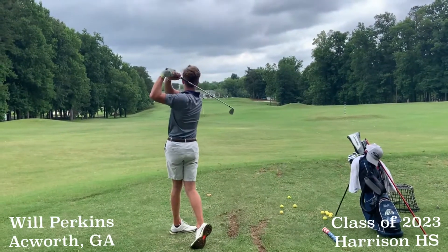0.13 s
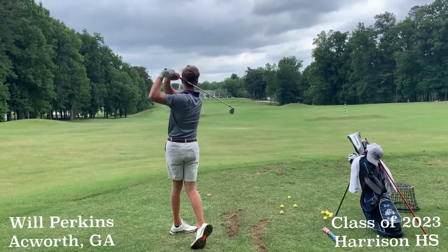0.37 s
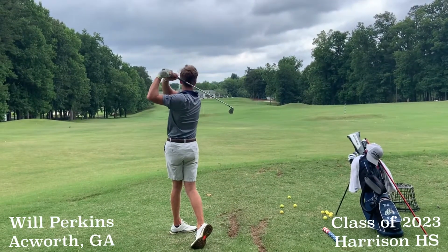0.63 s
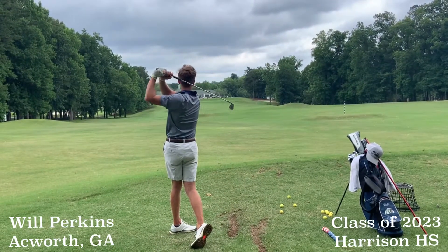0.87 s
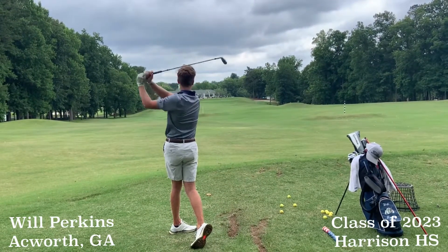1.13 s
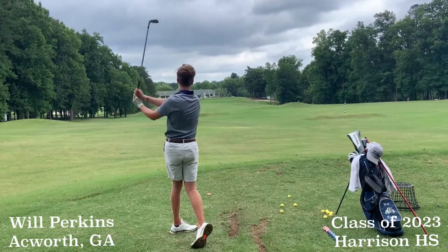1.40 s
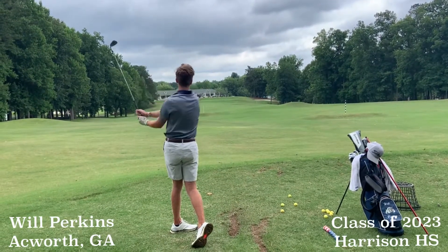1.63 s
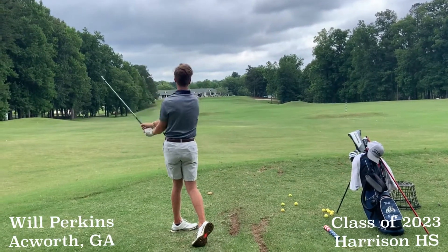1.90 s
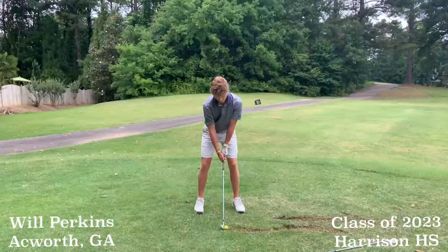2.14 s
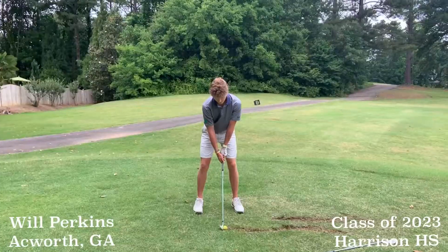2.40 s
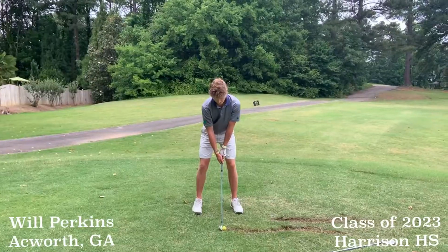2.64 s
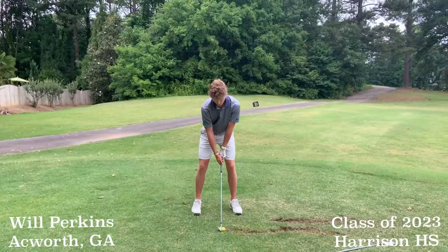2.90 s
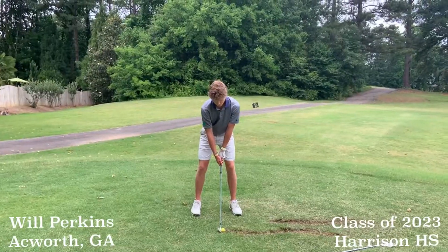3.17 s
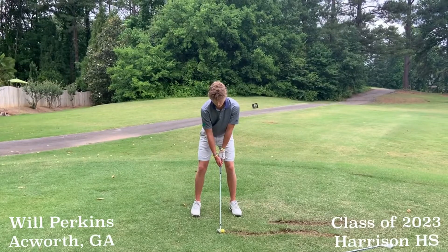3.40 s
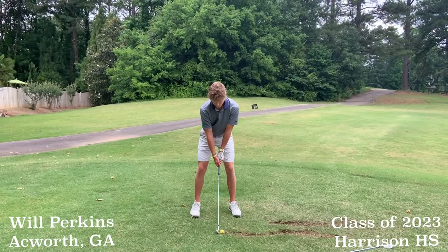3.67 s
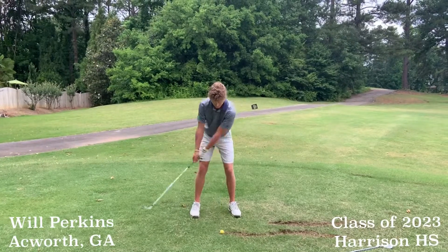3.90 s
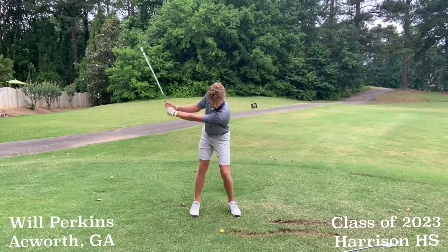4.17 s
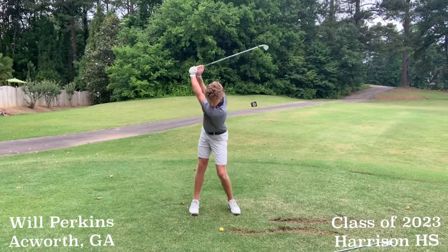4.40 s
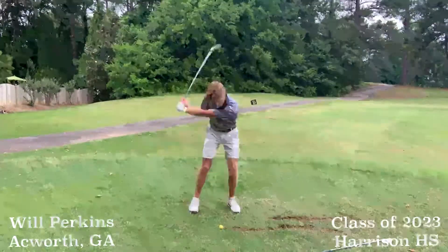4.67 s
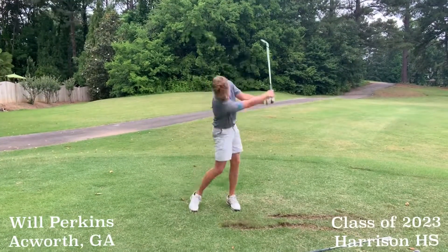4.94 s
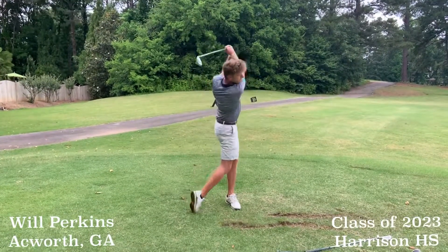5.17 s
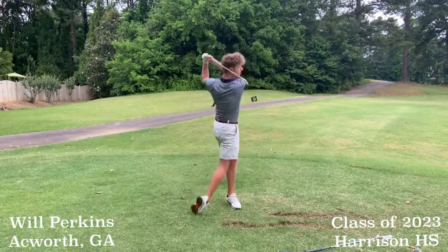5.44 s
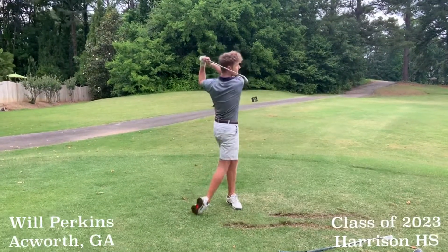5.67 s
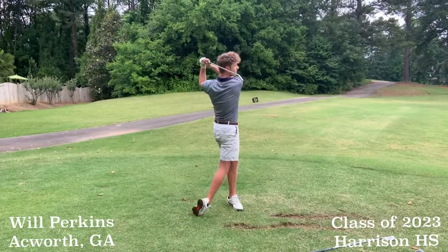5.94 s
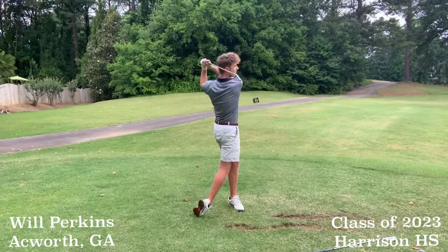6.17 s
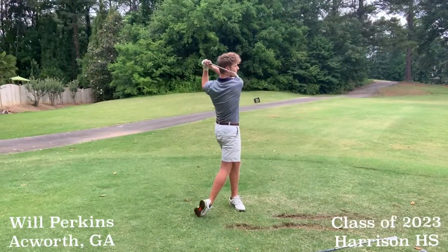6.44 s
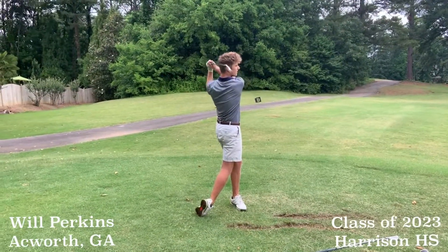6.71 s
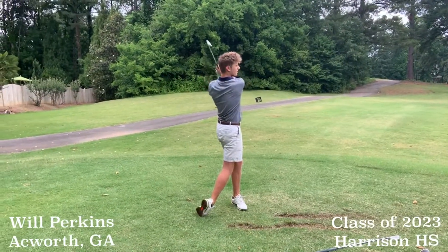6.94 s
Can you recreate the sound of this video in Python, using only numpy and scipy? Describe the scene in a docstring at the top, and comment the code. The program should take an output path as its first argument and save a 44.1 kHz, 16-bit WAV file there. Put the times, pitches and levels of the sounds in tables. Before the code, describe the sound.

Handheld stereo phone outdoors, wind rumbling on the microphone throughout. First a quiet fairway with faint engine hum, tiny birds and two moments of dry club clinking. After an abrupt edit, rapid bird trills, clear falling whistles and a throbbing far engine that fades. Short high chips precede a fast club whoosh and a loud, dry iron strike, its wash scattering through trees; the engine returns at the end.

```python
"""Golf: fairway, then a tee shot

Fairway: shaped noise for leaves and far traffic, engine hum, chirps, a thin whistle, clubs clinking as damped modes.
After a short silence, the tee: gliding near-sines for a trilling and a whistling bird, a far mower and a throbbing
engine. An iron sheds vortices, cracks the ball (ringing modes) and tears the turf; decaying noise is the echo.
Wind noise and falling thumps buffet the stereo microphone of a phone throughout."""
import sys
import numpy as np
from scipy import signal
from scipy.fft import rfft, irfft, next_fast_len
from scipy.io import wavfile
from scipy.ndimage import uniform_filter1d

SR = 44100
rng = np.random.default_rng(int(sys.argv[2]) if len(sys.argv) > 2 else 0)


def elevation(decibels):
    """Turn decibel levels (scalar or array-like) into linear amplitude ratios."""
    levels = np.asarray(decibels, float)
    return 10 ** (levels / 20)


def wav_out(sig):
    """Save sig, one row per channel (or a flat mono array), as 16-bit PCM at SR to the path in sys.argv[1]."""
    wavfile.write(sys.argv[1], SR, np.round(np.clip(np.atleast_2d(sig).T, -1, 1) * 32767).astype(np.int16))


N = 311787
TIME_S = np.arange(N) / SR
CUT_S, RESUME_S = 2.1885, 2.199  # fairway ends, tee begins
LEFT_RIGHT_SIGN = np.array([[1], [-1]])  # spreads a side signal
TREBLE_LAG_SAMPLES = 8  # left port hears the treble of the strike late

# contacts of the strike, ball first, then sole and turf:
# (time [s], level [dB], contact time [ms], grit [dB], tearing [dB])
CONTACTS = [(4.8457, -15.5, .16, -8, -15), (4.8462, -15.5, .13, -15, -16), (4.8477, -8, .09, -17, -16),
            (4.8496, -19.5, .08, -12, -20), (4.8499, -15.5, .52, -20, -20), (4.8516, -13, .53, -28, -24),
            (4.8549, -19, 1.3, -36, -24)]


def read_log(table, hz):
    """Interpolates a (frequency [Hz], value) table on a log-frequency axis."""
    f, value = np.transpose(table)
    return np.interp(np.log(np.maximum(hz, 1)), np.log(np.maximum(f, 1)), value)


def unit(x):
    """Scales to rms 1."""
    return x / np.sqrt(np.mean(x ** 2))


def waver(rate_hz):
    """Random levels held 1 / rate_hz s, then smoothed twice; rms 1."""
    hold = int(SR / rate_hz)
    steps = np.repeat(rng.standard_normal(N // hold + 1), hold)
    return unit(uniform_filter1d(uniform_filter1d(steps, hold), hold)[:N])


def noise(gain):
    """Noise whose spectrum follows gain(Hz)."""
    size = next_fast_len(N)
    hz = np.arange(size // 2 + 1) * SR / size
    return irfft(rfft(rng.standard_normal(size)) * gain(hz), size)[:N]


def coloured(colour):
    """Noise of rms 1 with a (frequency [Hz], density [dB]) colour."""
    return unit(noise(lambda hz: elevation(read_log(colour, hz))))


def octaves(colour, lowest_hz):
    """Coloured noise, rms about 1 in sum, as five octave bands; the outer two take all beyond."""
    def band_gain(hz, k):
        octave = np.log2(np.clip(hz / lowest_hz, 1, 16))
        return elevation(read_log(colour, hz)) * np.cos(np.pi / 2 * np.clip(octave - k, -1, 1))
    return unit(np.array([noise(lambda hz: band_gain(hz, k)) for k in range(5)])) / np.sqrt(5)


def band(x, lo_hz, hi_hz):
    """Band-pass."""
    return signal.sosfilt(signal.butter(2, [lo_hz, hi_hz], "band", fs=SR, output="sos"), x)


def gain_over_time(table, column=1):
    """Gain from a dB column against time, silent outside the table."""
    rows = np.array(table)
    return elevation(np.interp(TIME_S, rows[:, 0], rows[:, column], -200, -200))


def ring(x, hz, t60_s):
    """One damped mode driven by x."""
    pole = np.exp(2j * np.pi * hz / SR - np.log(1000) / (t60_s * SR))
    return signal.lfilter([1], [1, -pole], x).imag


def add(out, start_s, x):
    """Mixes x into out from start_s."""
    i = int(start_s * SR)
    out[..., i:i + x.shape[-1]] += x


def spaced(x, left_lag_samples, left_minus_right_db):
    """A point source on two ports: delay and level difference."""
    left = np.roll(x, left_lag_samples) * elevation(left_minus_right_db / 2)
    return np.array([left, x * elevation(-left_minus_right_db / 2)])


def trees(x, t60_s, db, onset_s=.012):
    """Scattering among trunks and leaves: a decaying noise tail, unrelated left and right."""
    t = np.arange(int(.6 * SR)) / SR
    tail = rng.standard_normal((2, len(t))) * elevation(-60 * t / t60_s) * (1 - np.exp(-t / onset_s))
    tail = tail / np.sqrt(np.sum(tail ** 2) / 2)
    return elevation(db) * signal.fftconvolve(x[None], tail, axes=1)[:, :N]


def note(table):
    """A bird's near-sine along (time [s], pitch [Hz], rms level [dB]) rows; returns start and sound."""
    s, hz, db = np.transpose(table)
    t = np.arange(s[0], s[-1], 1 / SR)
    fade = np.clip(np.minimum(t - s[0], s[-1] - t) / .003, 0, 1)
    phase = 2 * np.pi * np.cumsum(np.interp(t, s, hz)) / SR
    return s[0], np.sqrt(2) * fade * elevation(np.interp(t, s, db)) * np.sin(phase)


def air(mid_colour, side_colour, side_db, swell_db, flicker_db):
    """Leaves and far traffic: octave bands swell together, flicker alone; the road reaches left first."""
    # (time [s], level [dB])
    air_level = [(0, -61.5), (.5, -64), (2.19, -64.5), (2.36, -61), (3.1, -62), (4.7, -61), (5.4, -60.5),
                 (6.5, -62), (7.07, -59.5)]

    def octave(colour, centre_hz):
        def gain(hz):
            distance = np.clip(np.log2(hz / centre_hz + 1e-9), -1, 1)
            return elevation(read_log(colour, hz)) * np.cos(np.pi / 2 * distance)
        return noise(gain)

    mid, side, swell = 0, 0, waver(1.5)
    for centre_hz in 180 * 2. ** np.arange(7):
        gain = elevation(swell_db * swell + flicker_db * waver(6.7))
        mid = mid + gain * octave(mid_colour, centre_hz)
        side = side + gain * octave(side_colour, centre_hz)
    mid, side = (x / np.std(band(x, 600, 2100)) for x in (mid, side))
    leaves = mid + elevation(side_db) * LEFT_RIGHT_SIGN * side
    road = spaced(unit(band(band(rng.standard_normal(N), 500, 2000), 370, 2500)), -14, 0)
    return gain_over_time(air_level) * (elevation(-3.0) * leaves + elevation(-5.0) * road)


def hum(lines, waver_hz, waver_db):
    """Engine tones that waver in pitch and level over the distance."""
    out = 0
    for hz, db in lines:
        phase = 2 * np.pi * np.cumsum(hz + waver_hz * waver(5)) / SR
        out = out + np.sqrt(2) * elevation(db + waver_db * waver(13)) * np.sin(phase)
    return out


def drone():
    """A far engine fades away and later returns: throbbing, wavering firing tones in a band of rumble."""
    # (frequency [Hz], relative level [dB])
    firing_tones = [(207, -67), (274.5, -53.5), (344.5, -59), (411, -59.5), (482, -63.5), (578, -67.5)]
    # (time [s], level [dB])
    drone_level = [(2.2, -55), (2.35, -54), (2.45, -52.5), (2.6, -54), (2.75, -63.5), (3.0, -79),
                   (6.4, -81.5), (6.7, -69.5), (7.07, -57.5)]
    throb_hz, throb_db = 17, 2.5
    rumble = unit(noise(lambda hz: 1 / (1 + ((hz - 380) / 130) ** 4)))
    tones = unit(hum(firing_tones, 2.5, 1.5))
    throb = elevation(0.6 * waver(13) + throb_db * np.sin(2 * np.pi * throb_hz * TIME_S))
    return gain_over_time(drone_level) * throb * (0.55 * rumble + 0.9 * tones)


def wind():
    """Eddies rumble on the ports in quick bunches; single strong ones thump, falling in pitch as they pass."""
    # (time [s], level [dB])
    gust_level = [(0, -45), (.12, -46.5), (.22, -58), (.35, -39.5), (.52, -52.5), (1.2, -52), (1.7, -51),
                  (1.89, -42.5), (2.08, -54), (2.37, -42), (2.5, -47), (3.0, -45.5), (3.08, -38.5),
                  (3.29, -38), (3.45, -52), (3.75, -43), (4.16, -50.5), (4.21, -41), (4.6, -49),
                  (4.9, -43.5), (4.96, -37.5), (5.7, -49.5), (5.85, -47), (6.4, -49), (6.82, -48.5),
                  (6.89, -36.5), (7.0, -44.5), (7.07, -40)]
    # colours on fairway and tee: (frequency [Hz], density [dB])
    buffet_colours = [(12, -62), (20, -38), (42, -7), (70, 1.5), (97, -7), (118, -8.5), (172, -7.5),
                      (300, -36.5), (390, -68), (660, -120)], [(12, -38), (20, -23.5), (46, -1), (71, 2),
                      (124, -1), (204, -17), (236, -17.5), (300, -23), (390, -52), (660, -120)]
    # side against mid on fairway and tee [dB]
    side_db = -10, -54
    # single eddies: (time [s], level before swell and decay [dB], pitch approached [Hz])
    thumps = [(1.866, -42, 163), (2.343, -26.5, 124.5), (3.063, -25.5, 80), (3.122, -29, 127),
              (3.146, -28.5, 128), (3.258, -33, 142), (3.274, -29, 89), (4.196, -26, 118),
              (4.94, -18.5, 124), (5.248, -30, 198), (5.412, -31, 128.7), (5.96, -37, 148),
              (6.862, -36, 179)]
    on_fairway = TIME_S < CUT_S
    gust = gain_over_time(gust_level) * elevation(2.1 * waver(40) + 1.2 * waver(11))
    mid, side = (np.where(on_fairway, *(coloured(c) for c in buffet_colours)) for _ in range(2))
    out = gust * (mid + LEFT_RIGHT_SIGN * elevation(np.where(on_fairway, *side_db)) * side)
    t = np.arange(SR // 10) / SR
    envelope = np.minimum(t / 0.0029, 1) * np.exp(-t / 0.0058)
    for s, db, hz in thumps:
        phase = 2 * np.pi * np.cumsum(hz * (1.0 + np.exp(-t / 0.0038))) / SR
        add(out, s, elevation(db) * envelope * np.sin(phase))
    return out


def chatter():
    """Small birds far off in the trees beside the fairway: faint, uneven chirps around a few pitches."""
    # pitches [Hz]
    chirp_hz = [2220, 2300, 3900, 4700]
    loudest_db = -69
    out = np.zeros(N)
    for when, kind, tune, size in rng.random((36, 4)):
        s = when * (CUT_S - .1)
        hz = chirp_hz[int(kind * len(chirp_hz))] * (.96 + .08 * tune)
        db = loudest_db - 8 * size
        add(out, *note([(s, hz, db - 6), (s + .012, 1.02 * hz, db), (s + .03, .97 * hz, db - 8)]))
    return spaced(out, 3, -.1) + trees(out, 0.89, -1.6)


def small_birds():
    """A thin high whistle on the fairway, short chips on the tee: brief gliding tones."""
    # thin whistle: (peak time [s], level [dB], pitch [Hz], swell [s], fade [s])
    seeps = [(1.735, -76, 8700, 0.022, .07), (1.865, -72.5, 8560, .015, 0.086)]
    # (time [s], level [dB], pitch [Hz], pitch drop [share])
    chips = [(4.052, -65, 4760, 0.024), (4.3107, -60, 4640, 0.016), (4.36, -65, 4800, 0.033),
             (4.4555, -64, 4635, 0.014), (4.7098, -62, 4690, 0.02), (6.567, -66, 7500, -0.074)]
    out = np.zeros(N)
    for s, db, hz, swell, fade in seeps:
        add(out, *note([(s - swell, hz, db - 20), (s, hz, db), (s + fade, 1.01 * hz, db - 12)]))
    for s, db, hz, drop in chips:
        start, end = (s - .003, (1 + drop) * hz, db - 3), (s + 0.018, (1 - drop) * hz, db - 14)
        add(out, *note([start, (s + .003, hz, db), end]))
    return spaced(out, 2, -.1) + trees(out, 0.25, -6.5)


def whistling_bird():
    """Repeats one slurred near-sine, stretched in length and pitch."""
    # (time [s], pitch [Hz], level [dB])
    slur = [(0, 2980, -18), (.012, 3070, -9), (.045, 3105, -6), (.07, 3090, -5.5), (.088, 3060, 0),
            (.112, 2975, -4), (.135, 2850, -10), (.155, 2690, -6), (.178, 2490, -8), (.19, 2370, -20)]
    # (time [s], level [dB], stretch of length, stretch of pitch)
    whistles = [(2, -49, 0.93, 0.99), (2.385, -50, 1.02, 0.99), (4.022, -53, 0.99, 0.97),
                (4.395, -51.5, 1, 0.99), (6.026, -52, 0.99, .997), (6.399, -52, 1.01, 1.003)]
    out = np.zeros(N)
    for s, db, stretch, tune in whistles:
        x = note(slur * np.array([stretch, tune, 1]))[1]
        add(out, s, elevation(db + .8 * waver(70)[:len(x)]) * x)
    return spaced(out, -13, -1.8) + trees(out, 0.3, -9, onset_s=.04) + trees(out, 0.9, -7)


def trilling_bird():
    """Each syllable is a quick upward sweep, then a downward one, slightly uneven in pitch and level."""
    # syllables: (peak time of the rising note [s], level [dB])
    syllables = [(2.17, -45), (2.301, -49), (2.44, -48), (2.572, -46), (2.708, -49), (2.843, -48),
                 (2.982, -48), (3.123, -48), (3.266, -46.5), (3.405, -49), (3.551, -52), (3.691, -51)]
    # note shapes: (time [s], pitch [Hz], relative level [dB])
    rise = [(-.04, 3300, -25), (-.024, 3950, -13), (-.013, 4500, -10), (-.005, 5000, -4), (0, 5400, -1.5),
            (.003, 5850, -6), (.006, 6300, -28)]
    fall = [(-.005, 7200, -26), (-.003, 6950, -16), (0, 6400, -20), (.002, 5950, 0), (.007, 5350, 3),
            (.01, 5150, -6), (.018, 5200, -22)]
    fall_lag_s, fall_db = 0.03, -3.5  # falling note against rising one
    out = np.zeros(N)
    for (s, rise_db), luck in zip(syllables, rng.standard_normal((len(syllables), 3))):
        falling_db = rise_db + fall_db + 1.2 * luck[2]
        pair = (s, rise_db, rise, luck[0]), (s + fall_lag_s, falling_db, fall, luck[1])
        for at, db, shape, detune in pair:
            start, x = note(shape * np.array([1, 1 + .012 * detune, 1]))
            add(out, at + start, elevation(db) * x * elevation(1.8 * waver(250)[:len(x)]))
    return spaced(out, -6, -1.5) + trees(out, .09, -12, onset_s=.003) + trees(out, .35, -11)


def clinks():
    """Steel heads touch in the bag: a dry tick, a short rattle, and where the head hangs free a faint ring."""
    # (time [s], level [dB], brightness [dB per octave], free ring [dB])
    touches = [(.9241, -44, 4, -34), (1.9955, -56, -3, -24), (2.0081, -38, 0, -24), (2.0212, -62, 1.1, 8),
               (2.0704, -60, -11, -30), (2.0856, -56, -16, -40), (2.0935, -62, -9, -8)]
    # modes: (frequency [Hz], level [dB], t60 [s], share of the free ring [0..1])
    head_modes = [(1100, -31, .0054, .1), (1590, -17, .007, .1), (2370, -8.5, .008, .28),
                  (3230, -8, .0054, .23), (3910, -17, .06, .44), (4880, -8, .2, .9), (4920, -6, .016, .2),
                  (5500, 7, .007, .1), (6000, -12, .09, 1), (6900, -14, .16, 1), (7400, -30, .005, .34)]
    out, t = np.zeros(N), np.arange(SR // 4) / SR
    for (s, db, tilt_db, ring_db), luck in zip(touches, rng.standard_normal((len(touches), len(head_modes)))):
        touch = (t == 0) + elevation(-31) * np.exp(-t / 0.025) * rng.standard_normal(len(t))
        for (hz, mode_db, t60_s, free), u in zip(head_modes, luck):
            gain = elevation(db + mode_db + free * ring_db + tilt_db * np.log2(hz / 6700.0) + 1.4 * u)
            add(out, s, gain * ring(touch, hz, t60_s))
    out = band(out, 900, 8000)
    return spaced(out, -2, -.1) + trees(out, .25, -13)


def aftermath():
    """The crack comes back from many trunks as a rough wash with an airy top; bits of turf patter down."""
    # reflectors: (distance [m], level [dB], time to rise the last 12 dB [s], t60 [s])
    reflectors = [(2.48, -52, 0.00214, 0.077), (18.5, -50.5, 0.089, 0.35), (35, -58, .03, 0.54)]
    # (frequency [Hz], density [dB])
    echo_colour = [(240, -30), (400, -5), (859, -12.5), (1320, -11.5), (2230, -8), (3770, -16.5),
                   (6460, -17.5), (7600, -27), (8300, -56), (10400, -69), (17600, -120)]
    # hanging treble from near, middle and far scatter: (level [dB], t60 [s])
    airy_top = [(-56, 0.073), (-59, .45), (-80, 3.1)]
    # bits of turf landing, later two scuffs in the grass: (time [s], level [dB], frequency [Hz])
    turf_bits = [(4.925, -38, 3100), (4.957, -45, 1900), (4.968, -49, 2300), (4.992, -36, 2210),
                 (5.052, -35, 1880), (5.081, -43, 1990), (6.946, -39.5, 1920), (7.024, -47, 1580)]
    swells = elevation(np.array([1.6 * waver(55) + 3 * waver(300) for _ in range(5)]))  # one per octave
    wash = np.array([np.sum(swells * octaves(echo_colour, 600), axis=0) for _ in range(2)])
    treble = unit(band(band(rng.standard_normal(N), 9600, 14000), 9600, 15500))
    top = spaced(treble, TREBLE_LAG_SAMPLES, 0)
    since = TIME_S - CONTACTS[-1][0]
    back = 0
    for distance_m, db, swell_s, t60_s in reflectors:
        late = since - 2 * distance_m / 343
        envelope_db = np.maximum(np.minimum(12 * late / swell_s, -60 * late / t60_s), -200)
        back = back + elevation(db + envelope_db) * (since > 0)
    hang = sum(elevation(db - 60 * np.clip(since, 0, 3) / t60_s) * (since > 0) for db, t60_s in airy_top)
    out = np.sqrt(2) * (back * wash + elevation(1.8 * waver(200)) * hang * top)
    t = np.arange(SR // 50) / SR
    for s, db, hz in turf_bits:
        patter = np.exp(-t / 0.008) * rng.standard_normal((2, len(t)))
        add(out, s, elevation(db) * band(patter, 0.89 * hz, 1.3 * hz))
    return out


def swing():
    """The shaft sheds vortices at a rate that follows its speed; the head drags a broad rush."""
    # downswing and follow-through: (time [s], shaft speed [m/s], vortex tone [dB])
    path = [(4.73, 5, -72), (4.76, 11, -60), (4.782, 15.5, -43), (4.793, 18, -37), (4.81, 25, -40),
            (4.828, 30, -45), (4.845, 33, -38), (4.862, 17, -50), (4.877, 19, -49), (4.9, 11, -66),
            (4.93, 5, -80)]
    # (frequency [Hz], density [dB])
    rush_colour = [(300, -29), (600, -5), (1580, -10.5), (2300, -9), (3320, -23.5), (6230, -20),
                   (8530, -40), (10700, -30), (16000, -48.5)]
    strouhal, shaft_m = .2, .01
    rush_db, db_per_decade, steeper_per_octave = -39, 34, 11  # at 30 m/s; growth with speed
    s, speed = np.transpose(path)[:2]
    speed = np.interp(TIME_S, s, speed, .1, .1)
    pitch_hz = strouhal * speed / shaft_m * (1 + .12 * waver(220))
    tone = np.sqrt(2) * elevation(4.5 * waver(200)) * np.sin(2 * np.pi * np.cumsum(pitch_hz) / SR)
    mid, side = (octaves(rush_colour, 600) for _ in range(2))
    rush = 0
    for k in range(len(mid)):
        growth_db = (db_per_decade + k * steeper_per_octave) * np.log10(speed / 30)
        gain = elevation(rush_db + growth_db + 2.0 * waver(150))
        rush = rush + gain * (mid[k] + 0.476 * LEFT_RIGHT_SIGN * side[k])
    return gain_over_time(path, column=2) * tone + rush


def strike():
    """Contacts push modes of head, ball and ground, softer ones longer and lower; grit sprays, turf tears."""
    # (frequency [Hz], level [dB], t60 [s], left minus right [dB], left lag [samples])
    modes = [(245, -14, .09, -.7, 0), (390, -15, .035, 0, 0), (570, -12, .008, -2.5, 0),
             (825, -2.5, .017, -4, 0), (1040, -1, .017, -2, 0), (1350, 3.5, .005, -2, 1),
             (1615, -12, .025, -3.5, 1), (1960, 1, .0075, -1, 0), (2720, -5.5, .008, -2.5, 2),
             (2990, -10, .022, 0, 1), (3580, -7, .019, -9, 4), (5270, -6, .015, -8, 4),
             (7700, -2, .007, 1, 7), (10300, -12, .007, 0, 8), (12600, -11, .006, 0, 8)]
    push, grit, tear = np.zeros((3, SR // 4))
    t = np.arange(SR // 50) / SR
    first_s = CONTACTS[0][0]
    for s, db, contact_ms, grit_db, tear_db in CONTACTS:
        half_sine = np.sin(np.pi * np.minimum(t / contact_ms * 1000, 1))
        add(push, s - first_s, elevation(db) * half_sine / max(contact_ms * SR / 2000, 1))
        add(grit, s - first_s, elevation(grit_db) * np.exp(-t / .0009))
        add(tear, s - first_s, elevation(tear_db) * np.exp(-t / .0015))
    body = 0
    for k, (hz, db, t60_s, pan_db, lag) in enumerate(modes):
        # neighbouring modes swing in opposite senses
        body = body + (-1) ** k * spaced(elevation(db) * ring(push, hz, t60_s), int(lag), pan_db)
    spray = spaced(band(grit * rng.standard_normal(len(grit)), 6000, 14600), TREBLE_LAG_SAMPLES, -1)
    turf = spaced(band(tear * rng.standard_normal(len(tear)), 760, 3500), 1, -2.25)
    out = np.zeros((2, N))
    add(out, first_s, band(body, 120, 18000) + spray + turf)
    return out


def scene():
    """The fairway until the cut, the tee after a moment of silence."""
    # air: mid and side colours (frequency [Hz], density [dB]), then side minus mid [dB]
    fairway_air = [(130, -4), (220, -1), (612, -10), (830, -10.5), (1190, -17.5), (2220, -20),
                   (2760, -20.5), (6300, -26), (8850, -46.5), (11000, -41), (12200, -45.5), (12900, -49),
                   (16000, -63)], [(88, -34), (150, -4), (254, -12), (555, -10), (871, -15.5), (1760, -24),
                   (2310, -18), (5460, -25.5), (9260, -41), (10400, -49), (12700, -44), (13700, -40),
                   (16000, -63)], -2.2
    tee_air = ([(130, -26.5), (220, -3.5), (623, -15.5), (706, -11), (941, -17), (1400, -16.5), (2000, -24),
               (2960, -21.5), (6640, -35), (7530, -42.5), (8090, -55.5), (11000, -43.5), (16000, -71.5)],
               [(130, -49.5), (220, -10), (569, -5), (1420, -7.5), (3070, -13), (3680, -17.5),
               (4990, -17.5), (6760, -32.5), (8850, -31.5), (9680, -35), (10400, -55.5), (13600, -33),
               (16000, -56.5)], -0.39)
    # far engines: (frequency [Hz], rms level [dB])
    fairway_hum = [(166.9, -60.5)]
    mower_hum = [(234, -65.5), (275, -71), (344, -73), (409.1, -82.5), (583, -77.5), (700, -77.5),
                 (927, -80.5), (818.3, -76.5), (1400, -73.5), (1518, -81.5)]
    throughout = wind() + small_birds()
    fairway = air(*fairway_air, 0.16, 0.97) + hum(fairway_hum, 3.66, 2.1) + chatter() + clinks()
    tee = air(*tee_air, 1.0, 1.0) + hum(mower_hum, 3.008, 2.8) + drone()
    tee = tee + (whistling_bird() + trilling_bird()) * (TIME_S > CUT_S)
    tee = tee + aftermath() + swing() + strike()
    fade_in = np.clip((TIME_S - RESUME_S) / 0.0012, 0, 1)
    return (fairway + throughout) * (TIME_S < CUT_S) + (tee + throughout) * fade_in


def low_pass(x):
    """Removes everything above the highest recorded frequency."""
    return signal.sosfilt(signal.butter(12, 16740, fs=SR, output="sos"), x)


def record(dry):
    """The phone rounds the loudest peaks and cuts the top."""
    rounded = np.tanh(1.133 * dry) / 1.129
    top_cut = signal.ellip(8, .2, 70, 15700, fs=SR, output="sos")
    return low_pass(signal.sosfilt(top_cut, rounded))


dry = scene()
out = record(dry)
wav_out(out)
```